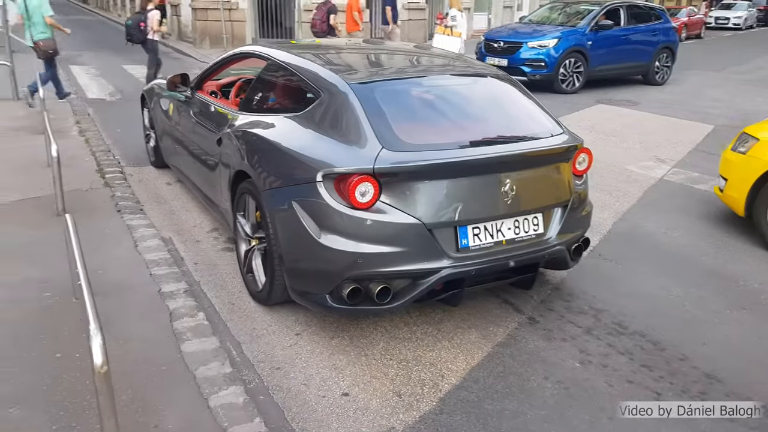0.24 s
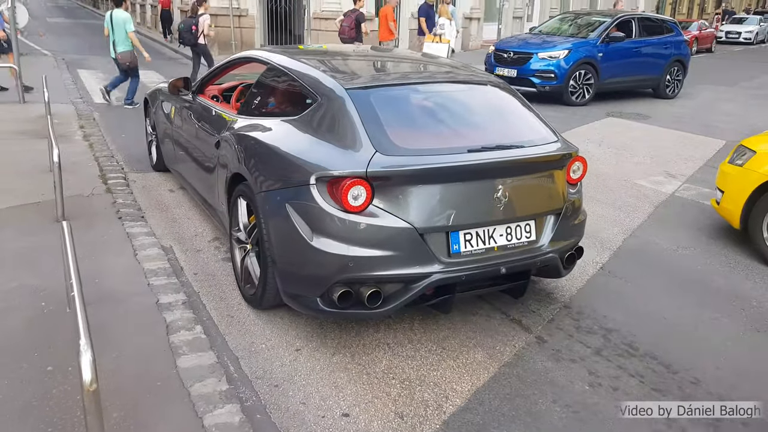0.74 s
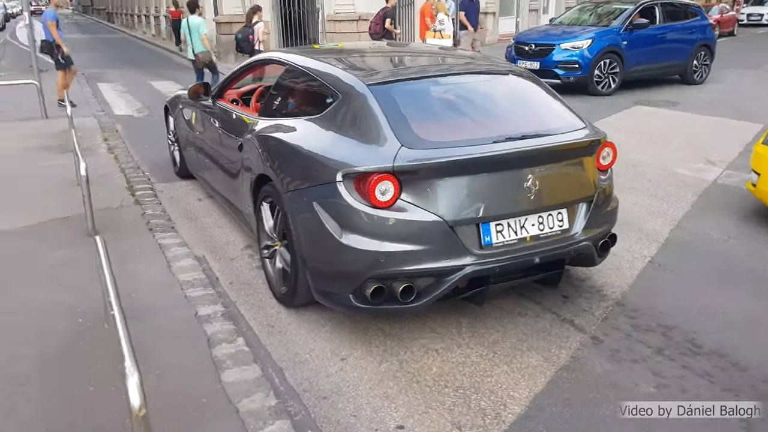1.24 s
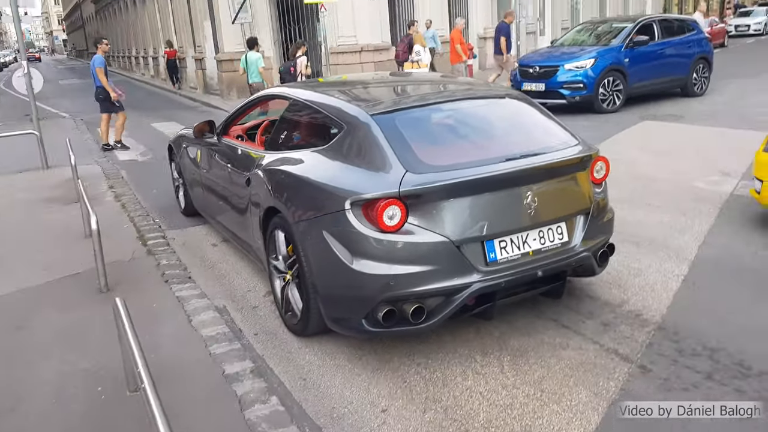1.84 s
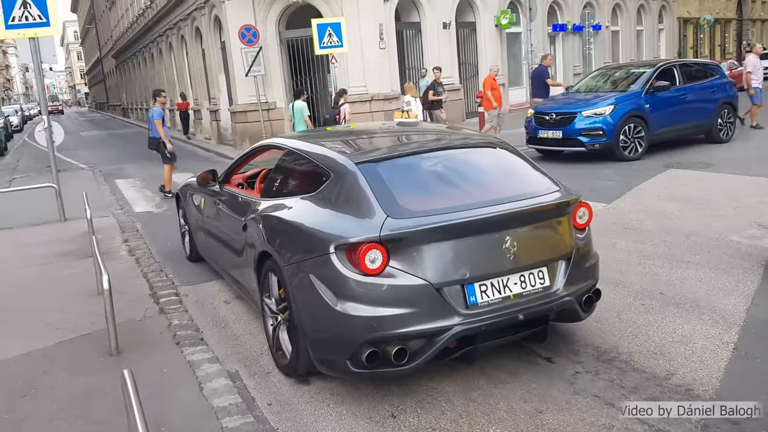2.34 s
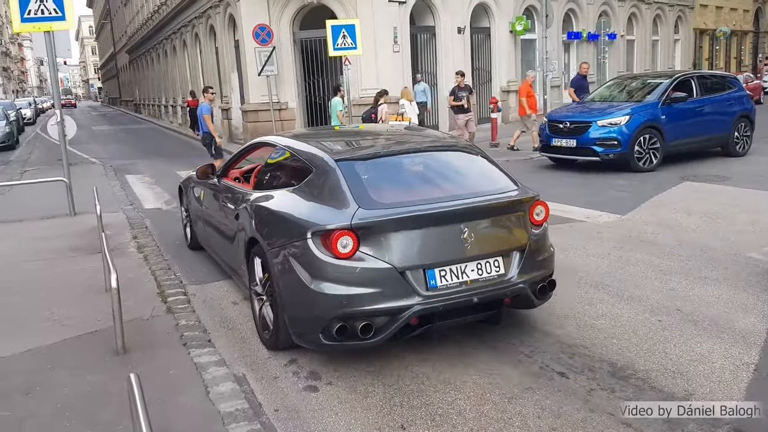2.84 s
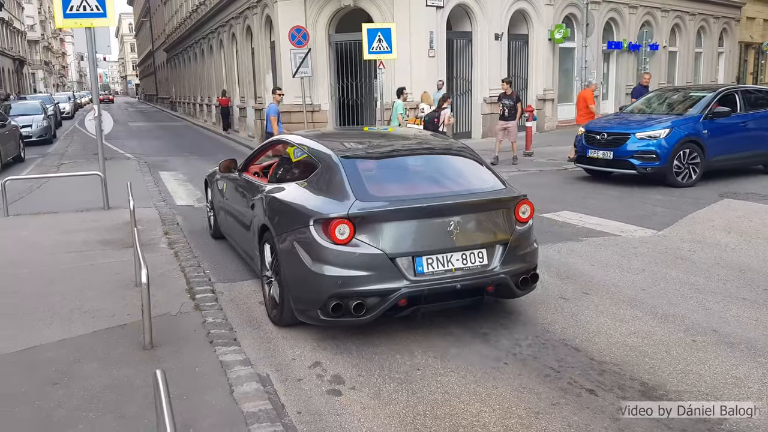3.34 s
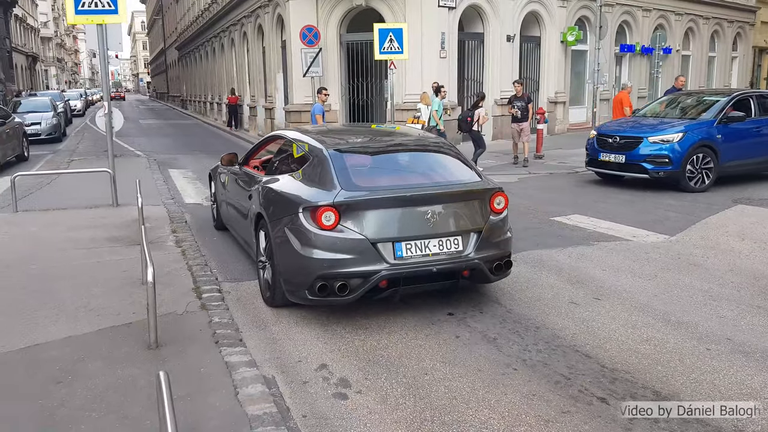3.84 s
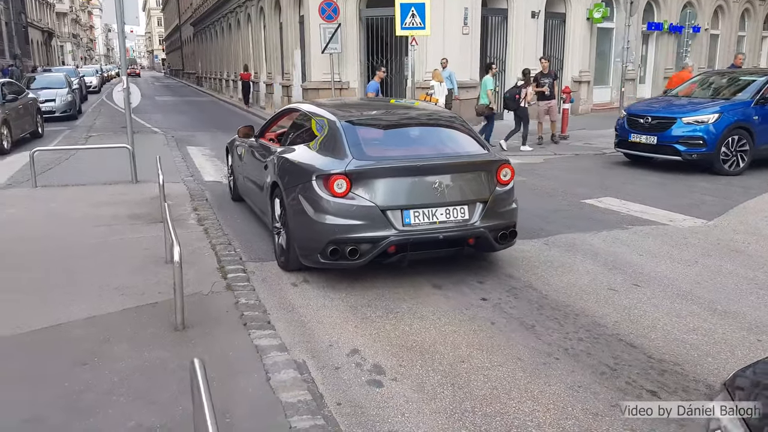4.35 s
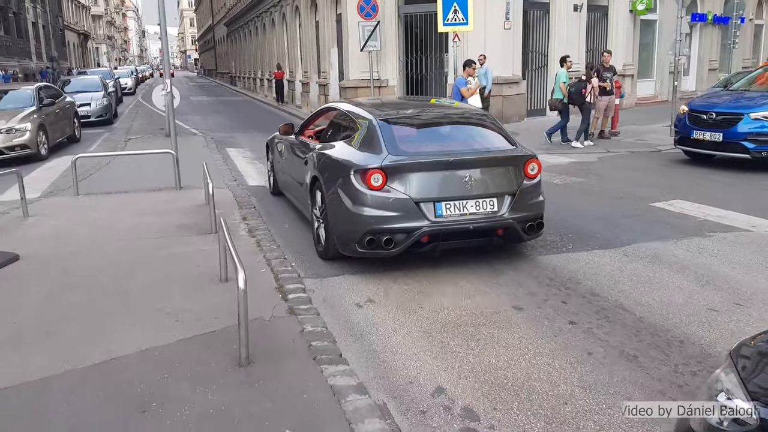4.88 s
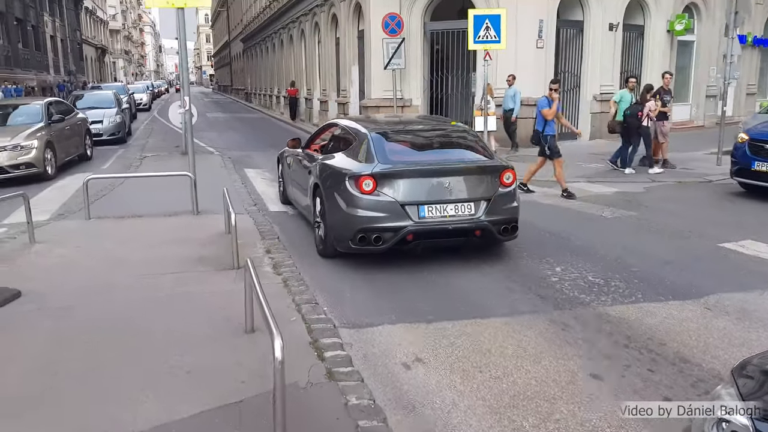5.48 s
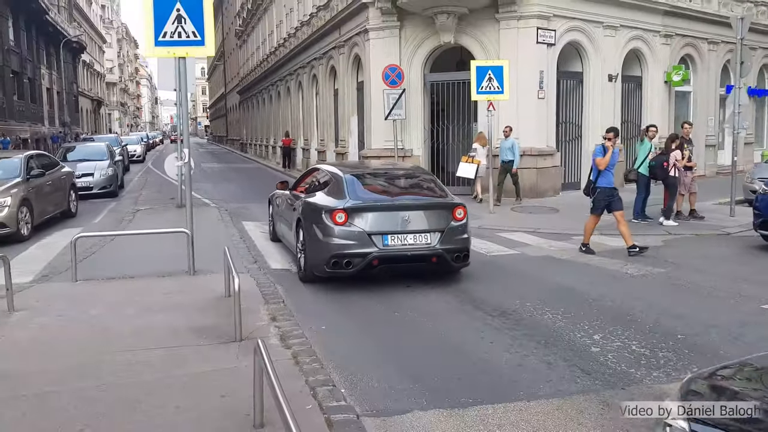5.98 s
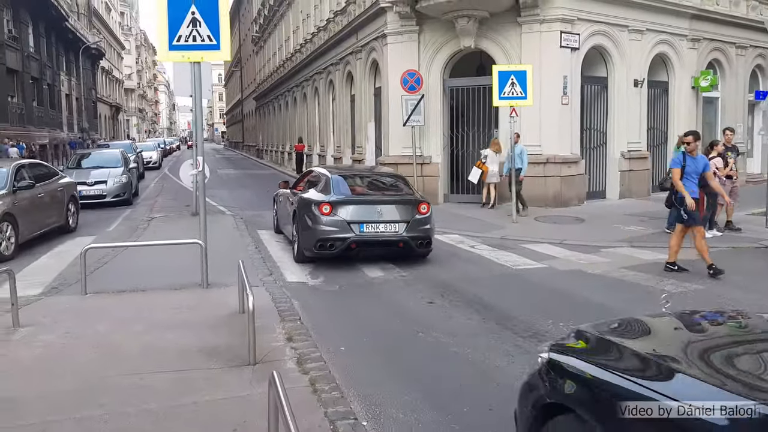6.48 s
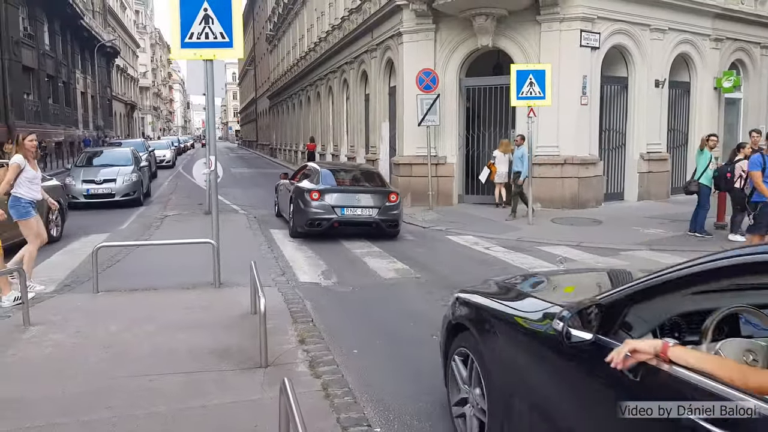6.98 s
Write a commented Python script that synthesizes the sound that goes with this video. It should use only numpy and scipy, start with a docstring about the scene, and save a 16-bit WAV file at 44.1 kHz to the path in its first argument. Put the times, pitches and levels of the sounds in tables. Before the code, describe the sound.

Heard from a few metres behind, a powerful car engine rumbles at low revs beside the dull drone of another engine. It rises in a booming swell with a rush of exhaust gas and a single sharp pop, dips to idle, then accelerates off with a howling growl. City traffic washes around it, and a following car's tyres hiss softly near the end.

```python
"""Sports car leaving a kerb

A twelve-cylinder creeps off in a city street: one swell of revs, a dip, then it pulls away.
Its tailpipes boom at the firing rate of one bank; firing pulses ring the pipes, and turbulent gas
burbles and rushes on top. A second engine turns over slowly nearby. Grit ticks under the tyres,
one hard pop sounds, and a following car hisses up amid the wash of traffic."""
import sys
import numpy as np
from scipy import signal
from scipy.fft import rfft, irfft
from scipy.io import wavfile

SR = 44100
rng = np.random.default_rng(int(sys.argv[2]) if len(sys.argv) > 2 else 0)


def dump_mix(stems):
    """Bounce the given channels to the path in sys.argv[1] as a 16-bit WAV at rate SR."""
    frames = np.atleast_2d(stems).T  # one column per channel
    limited = np.clip(frames, -1, 1)  # hard clip at full scale
    pcm = np.round(limited * 32767).astype(np.int16)
    wavfile.write(sys.argv[1], SR, pcm)


N = 318402
TIME_S = np.arange(N) / SR
BINS_HZ = np.fft.rfftfreq(N, 1 / SR)


def amp(db):
    """Decibels to gain."""
    return 10 ** (np.asarray(db) / 20)


def unit(x):
    """Scale to rms 1."""
    return x / np.sqrt(np.mean(x ** 2) + 1e-20)


def curves(rows):
    """Each column of a timed table, per sample."""
    times_s, *columns = np.transpose(rows)
    return [np.interp(TIME_S, times_s, column) for column in columns]


def spectrum(points):
    """A frequency table, per bin."""
    hz, value = np.transpose(points)
    return np.interp(np.log(BINS_HZ + 1), np.log(hz + 1), value)


def band(centre_hz, width_oct, hz=BINS_HZ):
    """Bell-shaped gain over log frequency."""
    return np.exp(-.5 * (np.log2((hz + 1) / centre_hz) / width_oct) ** 2)


def tint(x, gain):
    """Filter by a gain per bin; rms 1."""
    return unit(irfft(rfft(x) * gain, N))


def drift(rate_hz, grid_hz=2000):
    """Random wander up to about rate_hz; rms 1."""
    steps = int(np.ceil(N / SR)) * grid_hz
    hz = np.fft.rfftfreq(steps, 1 / grid_hz)
    slow = irfft(rfft(rng.standard_normal(steps)) / (1 + (hz / rate_hz) ** 4), steps)
    return unit(np.interp(TIME_S, np.arange(steps) / grid_hz, slow))


def resonate(x, hz, width_hz):
    """Steep resonance; its centre may move."""
    carrier = np.exp(2j * np.pi * np.cumsum(hz * np.ones(N)) / SR)
    r = np.exp(-np.pi * width_hz / SR)
    return 2 * (carrier * signal.lfilter([(1 - r) ** 2], [1, -2 * r, r * r], x / carrier)).real


def pan(left_db):
    """Stereo gains for a left-right level difference."""
    return amp([[left_db / 2], [-left_db / 2]])


def from_car(x, lead_samples=18):
    """Direct sound from the car arrives on the left first."""
    return np.array([x, np.pad(x, (lead_samples, 0))[:N]])


# Diffuse field: (frequency [Hz], left-right correlation [-1..1])
COHERENCE = [(50, 0.94), (170, 1), (300, 0.81), (600, 0.44), (1100, -0.43), (1700, -0.078), (2500, 0.073),
             (15000, -0.079)]

def diffuse(gain):
    """Coloured stereo noise, alike in the bass, unrelated in the treble."""
    left, other = rfft(rng.standard_normal((2, N)))
    alike = spectrum(COHERENCE)
    right = alike * left + np.sqrt(1 - alike ** 2) * other
    return unit(irfft(np.array([left, right]) * gain, N))


# Engine speed: (time [s], firing rate of one bank [Hz])
REVS = [(0.0, 70.4), (0.7, 71.2), (1.16, 89.9), (1.48, 106.6), (2.18, 120.7), (2.65, 106.5), (2.75, 90.1),
        (2.87, 91.7), (2.95, 81.8), (3.24, 73.4), (3.79, 71.7), (4.11, 93.2), (4.37, 125.2), (4.65, 136.4),
        (5.04, 129.2), (5.45, 128.4), (5.97, 138.8), (6.36, 152.9), (7.07, 190.5), (7.22, 191.6)]

def firing_cycles(hunt=.0035, hunt_hz=12):
    """Running count of one bank's firings; the speed hunts slightly."""
    return np.cumsum(curves(REVS)[0] * (1 + hunt * drift(hunt_hz))) / SR


def octaves_up(idle_hz=72):
    """Engine speed in octaves above idle."""
    return np.log2(curves(REVS)[0] / idle_hz)


# Pedal: (time [s], throttle [0..1])
THROTTLE = [(0, .26), (.68, .2), (.92, 0), (1.15, .18), (1.38, .82), (2, .66), (2.7, .76), (2.88, .8),
            (2.97, .39), (3.35, .28), (3.5, .39), (3.75, .3), (4.17, .17), (4.61, .85), (5, .78),
            (5.45, .78), (5.85, 1), (6.3, .98), (7.22, .75)]
# Tailpipes to listener: (time [s], distance [m])
DISTANCE = [(0, 3.06), (1.5, 2.82), (3, 3.23), (4.5, 4.44), (6, 6.5), (7.22, 10.5)]
NEAR_M = 3
# Exhaust response at NEAR_M: (frequency [Hz], gain [dB])
EXHAUST = [(35, -51), (55, -32), (72, -28.3), (110, -29), (145, -25), (175, -37), (200, -41.5), (260, -53)]
# Low engine tones: (multiple of firing rate [1], relative level [dB], full-throttle boost [dB])
TONES = [(1 / 2, -10, .8), (1, 0.1, 18.7), (1 + 1 / 2, -9.5, 14.5), (2, -4.6, 5.5)]
# Uneven firing: (time [s], gain of half multiples [dB])
UNEVEN = [(0, -2.5), (1.4, -1.5), (2.3, 3.5), (3.2, -2.5), (4.45, -1), (4.8, 9.5), (5.35, 8), (5.6, 1.5),
          (6.7, 1), (7.05, 13)]
# Dropouts as the throttle shuts: (time [s], half-width [s], depth [0..1])
LIFTS = [(2.703, .018, .75), (2.964, .018, .95)]

def boom(cycles):
    """Low tones swell with throttle and in the exhaust resonance; those of uneven firing waver most."""
    firing_hz, throttle = curves(REVS)[0], curves(THROTTLE)[0]
    pipe_hz, pipe_db = np.transpose(EXHAUST)
    out = 0
    for multiple, db, throttle_db in TONES:
        is_half = multiple % 1 > 0
        exhaust_db = np.interp(np.log(multiple * firing_hz), np.log(pipe_hz), pipe_db)
        level_db = db + throttle_db * throttle + exhaust_db + is_half * curves(UNEVEN)[0]
        if multiple == 1:
            wobble = .045 * drift(22)
        else:
            wobble = (.22 if is_half else .11) * (drift(11) + 1j * drift(11))
        out += amp(level_db) * ((1 + wobble) * np.exp(2j * np.pi * multiple * cycles)).real
    dips = sum(depth * np.exp(-((TIME_S - at_s) / width_s) ** 2) for at_s, width_s, depth in LIFTS)
    return np.sqrt(2) * out * (1 - dips) * NEAR_M / curves(DISTANCE)[0]


def rasp_gain(base_db=-64.5, pressure_db=15, octave_db=2, lag_s=.3):
    """Grows with revs and exhaust pressure, which lags the throttle; falls with distance."""
    throttle = curves(THROTTLE)[0]
    pole = np.exp(-1 / (lag_s * SR))
    pressure = throttle[0] + signal.lfilter([1 - pole], [1, -pole], throttle - throttle[0])
    level_db = base_db + pressure_db * pressure + octave_db * octaves_up()
    return amp(level_db) * np.sqrt(NEAR_M / curves(DISTANCE)[0])


# Silencer and tailpipe modes: (frequency [Hz], width [Hz], relative level [dB])
PIPE_MODES = [(328, 13, -5), (727, 32, 6.5), (1020, 50, -6), (2250, 170, -18)]

def rasp(cycles, scatter=.3, imbalance=.17):
    """One sharp pulse per firing rings the pipes; each cylinder has its own strength."""
    firings = np.flatnonzero(np.diff(np.floor(cycles)))
    cylinders = 1 + imbalance * unit(rng.standard_normal(size=6))
    pulses = np.zeros(N)
    pulses[firings] = np.resize(cylinders, len(firings))
    pulses[firings] += scatter * rng.standard_normal(N)[:len(firings)]
    ring = sum(amp(db) / (1 + 2j * (BINS_HZ - hz) / width_hz) for hz, width_hz, db in PIPE_MODES)
    body = amp(-20) / (1 + (BINS_HZ / 900) ** 2)
    low_cut = 1 - np.exp(-(BINS_HZ / 220) ** 4)
    return rasp_gain() * tint(pulses, (ring + body) * low_cut)


def with_echoes(x, road_gain=.24, car_gain=.11, pipe_height_m=.35, ear_height_m=1.5):
    """Echoes off the road and nearby cars; their colour shifts as the car leaves."""
    range_m = curves(DISTANCE)[0]
    direct_m = np.hypot(range_m, ear_height_m - pipe_height_m)
    bounce_m = np.hypot(range_m, ear_height_m + pipe_height_m)
    paths = [(road_gain, bounce_m - direct_m)]
    paths += [(car_gain, np.hypot(range_m, side_m) - range_m) for side_m in rng.uniform(2, 6, 3)]
    echoes = 0
    for gain, extra_m in paths:
        echoes += gain * np.array([np.interp(TIME_S - extra_m / 343, TIME_S, side) for side in x])
    return unit(x + echoes)


# Tailpipe gas flow: (time [s], relative level [dB])
FLOW = [(0, -14), (.4, -9), (1.15, -1.8), (2.3, -.3), (2.75, -5), (3.5, -7.3), (4, -14.5), (4.5, -6.5),
        (5.3, -12), (5.85, -10.5), (6.4, -16), (7.22, -16)]
# Gas noise spectra: (frequency [Hz], relative density [dB])
BURBLE = [(25, -28.5), (42, -4.5), (58, 2.5), (100, -1.5), (155, -1), (200, -10.5), (300, -12), (480, -23),
          (900, -45)]
RUSH = [(200,-24),(400,-0.5),(800,-2.5),(1400,-6.5),(2400,-12),(3000,-13.5),(4500,-15),(6200,-22),(8400,-27.5),(9600,-24.5),(11500,-23),(13000,-29.5),(15800,-30)]

def gas(cycles, burble_db=-31.3, octave_db=1.7, rush_db=-37, direct_share=.25, throb=.14):
    """Turbulent exhaust: a low burble, and a rush puffed out by each firing."""
    flow_db = curves(FLOW)[0]
    burble = diffuse(amp(spectrum(BURBLE) - 60 * (BINS_HZ > 1200)))
    burble *= amp(burble_db + .3 * flow_db + octave_db * octaves_up())
    colour = amp(spectrum(RUSH))
    direct = from_car(tint(rng.standard_normal(N), colour))
    hiss = np.sqrt(direct_share) * direct + np.sqrt(1 - direct_share) * diffuse(colour)
    puffs = unit(1 + throb * np.cos(2 * np.pi * cycles))
    rush = amp(flow_db + rush_db + .45 * drift(30)) * puffs * with_echoes(hiss)
    return burble * pan(.96) + rush * pan(3.5)


# Traffic wash: (time [s], level [dB])
TRAFFIC = [(0, -42), (2, -43.5), (3.9, -40.2), (5.9, -38.3), (7.22, -40)]
# Its spectrum: (frequency [Hz], relative density [dB])
STREET = [(90,-10),(200,-5.5),(400,-11.5),(580,-7.5),(900,-12),(1400,-13.5),(1900,-18),(3000,-23.5),(4500,-27),(6200,-32),(8400,-39),(11000,-39),(15800,-37.5)]

def street(gain_db=1.5, swell_db=.5):
    """Tyres and distant traffic, diffuse between the house fronts."""
    level_db = curves(TRAFFIC)[0] + gain_db + swell_db * drift(5.8)
    return amp(level_db) * diffuse(amp(spectrum(STREET))) * pan(.27)


def grit(gain_db=-51, grains_per_s=800, grain_hz=6000, clump_db=2.5):
    """Sand crunches under the tyres in clumps; its level follows the gas flow."""
    grains = rng.standard_normal((2, N)) * (rng.random((2, N)) < grains_per_s / SR)
    colour = band(grain_hz, width_oct=1.8) / np.sqrt(1 + BINS_HZ / grain_hz)
    crunch = tint(grains * amp(clump_db * drift(20)), colour)
    return amp(curves(FLOW)[0] + gain_db) * crunch * pan(1.7)


def overtones(cycles, half_gain=.55, rough=.6, flutter_hz=25):
    """Upper engine orders, each fluttering; half orders are weaker."""
    orders = 0
    for multiple in np.arange(3, 12, .5):
        strength = (half_gain if multiple % 1 else 1) * (1 + rough * drift(flutter_hz))
        orders += strength * np.cos(2 * np.pi * multiple * cycles + rough * drift(flutter_hz))
    return orders


def swells(cycles, orders, rows, tonal, throb):
    """Throbbing gas noise and engine orders swell and fade in exhaust resonances."""
    puffs = 1 + throb * np.cos(2 * np.pi * cycles)
    out = 0
    for peak_s, rise_s, fall_s, db, hz, width_hz in rows:
        baseband = drift(width_hz / 2) + 1j * drift(width_hz / 2)
        noise = (baseband * np.exp(2j * np.pi * hz * TIME_S)).real
        envelope = np.exp(-np.maximum((peak_s - TIME_S) / rise_s, (TIME_S - peak_s) / fall_s))
        voice = unit(noise * puffs) + tonal * unit(resonate(orders, hz, 2 * width_hz))
        out += amp(db) * envelope * unit(voice)
    return out


# Exhaust howls: (peak time [s], rise [s], fall [s], level [dB], centre [Hz], width [Hz])
HOWLS = [(.3, .6, .6, -50, 720, 150), (2, .6, .55, -43, 730, 75), (4.65, .15, 1.2, -49, 705, 130),
         (6.25, .13, .1, -39.5, 750, 80), (6.45, .06, .06, -42, 655, 70), (6.75, .12, .12, -44, 706, 60),
         (7.04, .13, .3, -39, 680, 60)]

def howl(cycles, orders):
    """The exhaust howls in a narrow resonance."""
    return swells(cycles, orders, HOWLS, tonal=.55, throb=.2)


# Second engine: (time [s], firing rate [Hz], level [dB])
SLOW_ENGINE = [(.27, 54, -56), (.34, 53.6, -30), (1, 52, -29), (1.5, 44.9, -37), (1.9, 47.9, -41),
               (2.3, 52.9, -34), (3, 54.3, -33), (3.3, 54, -51), (5, 52.2, -44), (6.3, 54, -43.5),
               (7.22, 53, -48)]

def slow_engine(waver=.11):
    """Dull drone of an engine at low revs."""
    hz, db = curves(SLOW_ENGINE)
    return amp(db) * unit((1 + waver * drift(8)) * np.sin(2 * np.pi * np.cumsum(hz) / SR))


# Grit, knocks, spits: (time [s], level [dB], decay [s], centre [Hz], width [oct], left-right [dB])
TICKS = [(.287, -28.5, 0.014, 220, 1.3, 1), (.3, -49.5, 0.014, 7000, .8, 0),
         (0.622, -44, .002, 7900, .7, 3), (1.1, -38, .12, 400, .6, 0), (1.18, -35, .02, 445, 0.38, 0),
         (1.8655, -24, .004, 620, .7, -9), (1.8662, -32, 0.002, 2200, .6, -9), (2.31, -34, .05, 340, .4, 0),
         (2.466, -38, 0.025, 3540, 0.3, -5), (2.478, -28.5, 0.0054, 1683, .45, 1),
         (2.492, -42.5, .014, 6500, 1.3, -3), (3.057, -37, .005, 2800, 0.25, -5),
         (3.059, -44, .004, 7000, .5, -7), (3.744, -45.5, 0.0095, 4600, 0.36, -2),
         (5.43, -38, .12, 300, .4, 0), (6.491, -41, 0.0014, 11400, 0.31, -10),
         (6.61, -42, 0.0023, 5940, 1.15, -1), (6.778, -44.5, 0.0026, 4800, 0.27, -1),
         (7.053, -35, 0.00074, 12500, 0.4, -12)]

def ticks(lead_samples=256):
    """Short noise bursts, each ringing in its own band."""
    out = np.zeros((2, N))
    t = np.arange(-lead_samples, SR // 8) / SR
    hz = np.fft.rfftfreq(len(t), 1 / SR)
    for at_s, db, decay_s, centre_hz, width_oct, left_db in TICKS:
        noise = rng.standard_normal((3, len(t)))  # left, right, common
        fade = np.exp(-abs(t) / decay_s) * (t >= 0)
        burst = irfft(rfft((noise[:2] + noise[2]) * fade) * band(centre_hz, width_oct, hz), len(t))
        burst = unit(burst) * np.sqrt(np.mean(fade ** 2))
        slot = out[:, round(at_s * SR) - lead_samples:][:, :len(t)]
        slot += (amp(db) * pan(left_db) * burst)[:, :slot.shape[1]]
    return out


# Gas whistles: (frequency [Hz], width [Hz], level at full flow [dB])
WHISTLES = [(9640, 700, -63.5), (11400, 500, -62.5)]

def whistles(flow_power=1.6, wander=.015, wander_hz=3, flicker_db=2):
    """Thin, wandering whistles that emerge when the gas flows fast."""
    out = 0
    for hz, width_hz, db in WHISTLES:
        gain = amp(db + flicker_db * drift(wander_hz))
        noise = rng.standard_normal(N)
        out += gain * unit(resonate(noise, hz * (1 + wander * drift(wander_hz)), width_hz))
    return amp(flow_power * curves(FLOW)[0]) * from_car(out)


# Exhaust growls: (peak time [s], rise [s], fall [s], level [dB], centre [Hz], width [Hz])
GROWLS = [(2.2, 1, .5, -43.5, 1060, 170), (2.57, .15, .25, -43.5, 1125, 160), (4.7, .22, 1, -43, 1225, 370),
          (7.15, .2, .3, -46.5, 1150, 300)]

def growl(cycles, orders):
    """Under load the exhaust growls in a wider, higher resonance."""
    return swells(cycles, orders, GROWLS, tonal=.9, throb=.55)


def pop(at_s=1.8666, gain_db=-6, length_s=.0006):
    """One hard pop: a single quick swing of pressure."""
    age = np.maximum(TIME_S - at_s, 0) / length_s
    return -amp(gain_db) * age * (2 - age) * np.exp(-age) * pan(-8)


def duct_whirr(peak_s=2.9, half_width_s=.95, peak_db=-51):
    """Air drawn through the cooling ducts swells and fades as the car creeps by."""
    swell = amp(peak_db) / (1 + ((TIME_S - peak_s) / half_width_s) ** 2)
    return swell * from_car(unit(resonate(rng.standard_normal(N), hz=2350, width_hz=520)))


def following_car(peak_s=5.85, half_width_s=.22, peak_db=-47):
    """Tyres hiss as the next car rolls up alongside."""
    swell = amp(peak_db) / (1 + ((TIME_S - peak_s) / half_width_s) ** 2)
    return swell * diffuse(band(centre_hz=1650, width_oct=.3))


def scene(fade_in_s=.006):
    """Stereo mix of cars and street; one crankshaft times all the sports car's firings."""
    cycles = firing_cycles()
    orders = overtones(cycles)
    resonances = howl(cycles, orders) + growl(cycles, orders)
    bass = (boom(cycles) + slow_engine()) * pan(1) * np.minimum(TIME_S / fade_in_s, 1)
    pipes = (rasp(cycles) + resonances) * pan(-.5)
    road = street() + following_car() + grit() + ticks()
    return bass + pipes + road + pop() + duct_whirr() + gas(cycles) + whistles()


def record(dry, bass_lag_s=.00013, cutoff_hz=15820):
    """Delay the bass slightly on the right, then low-pass both sides."""
    lag = np.exp(-2j * np.pi * BINS_HZ * bass_lag_s / (1 + (BINS_HZ / 500) ** 2))
    stereo = np.array([dry[0], irfft(rfft(dry[1]) * lag, N)])
    low_pass = signal.firwin(1023, cutoff_hz, window=("kaiser", 9), fs=SR)
    return signal.oaconvolve(stereo, low_pass[None], "same")


dry = scene()
out = record(dry)
dump_mix(out)
```